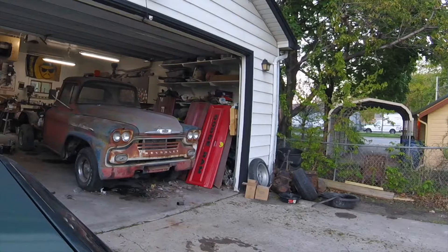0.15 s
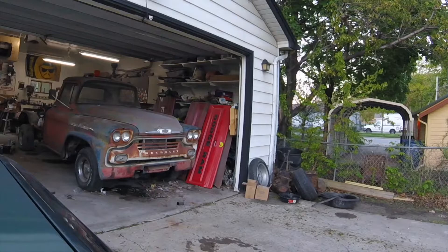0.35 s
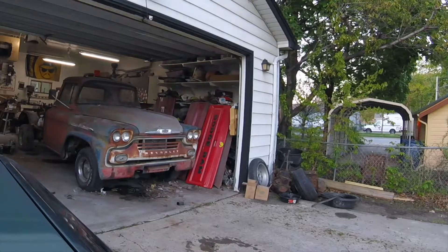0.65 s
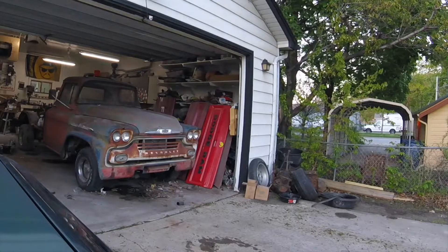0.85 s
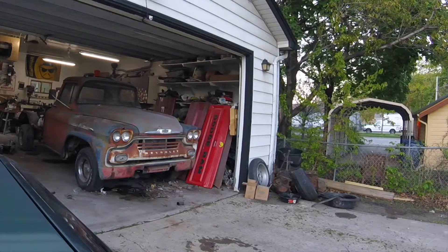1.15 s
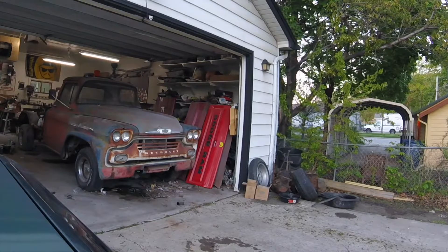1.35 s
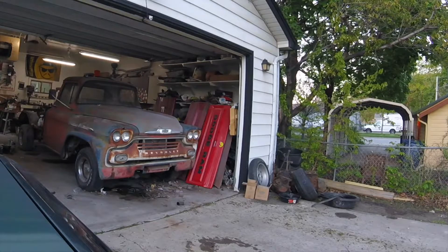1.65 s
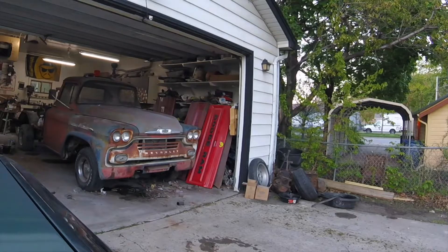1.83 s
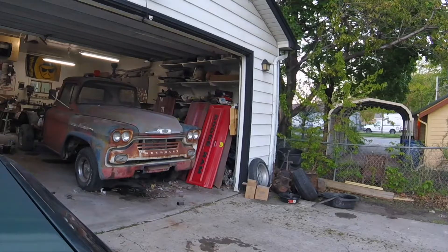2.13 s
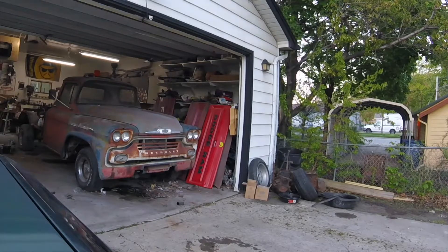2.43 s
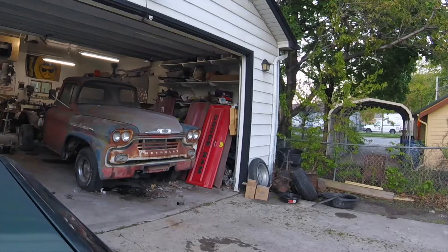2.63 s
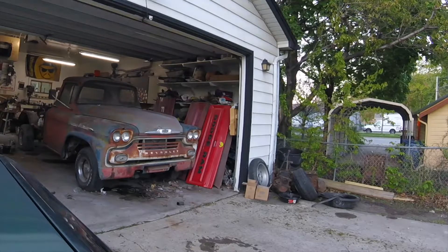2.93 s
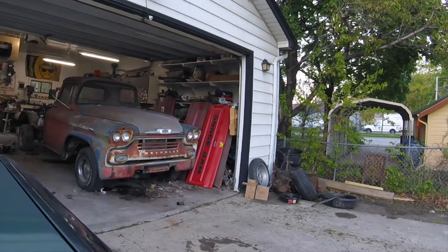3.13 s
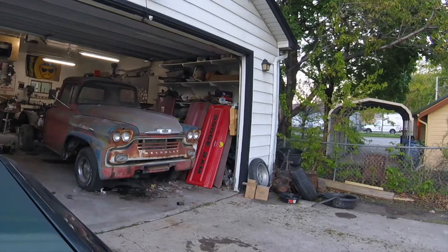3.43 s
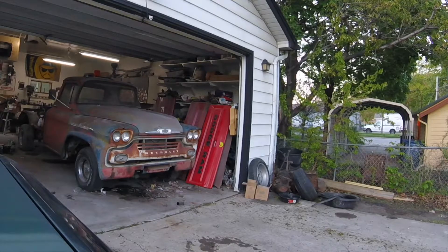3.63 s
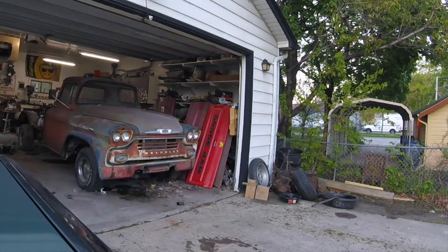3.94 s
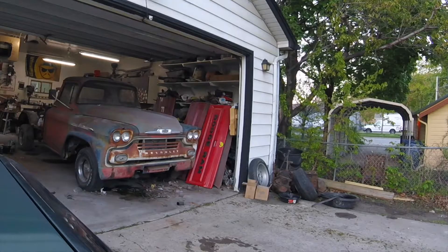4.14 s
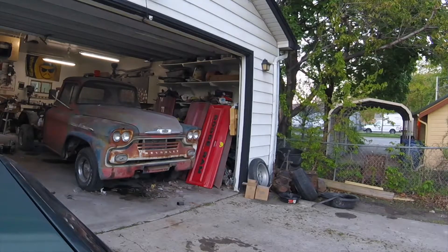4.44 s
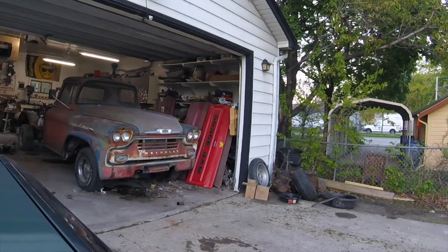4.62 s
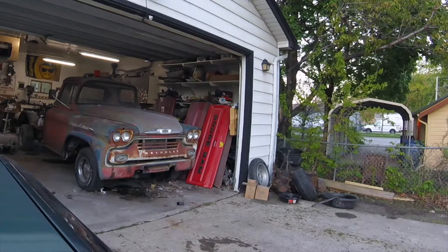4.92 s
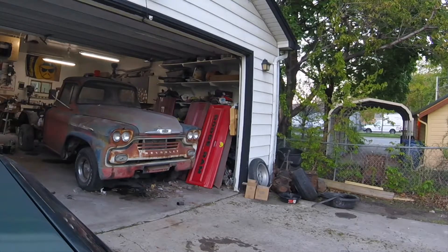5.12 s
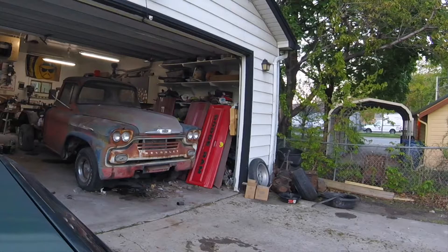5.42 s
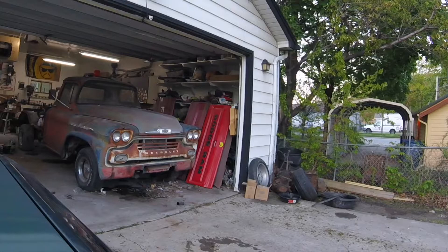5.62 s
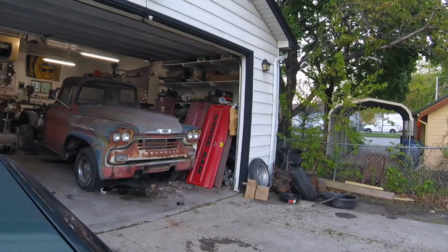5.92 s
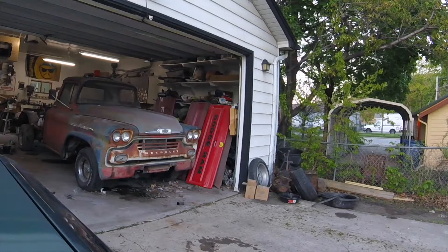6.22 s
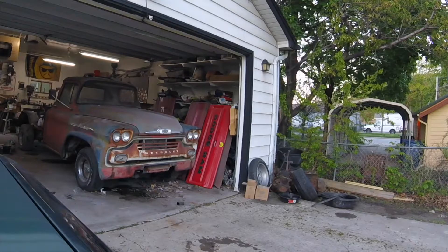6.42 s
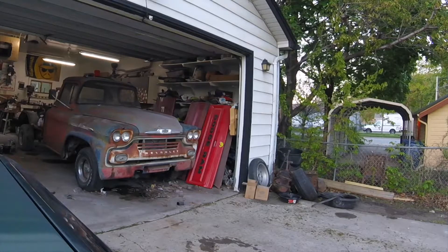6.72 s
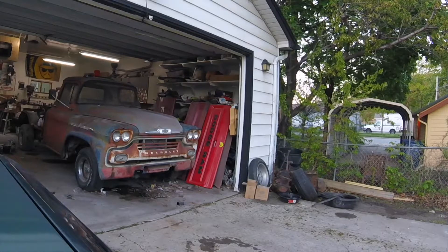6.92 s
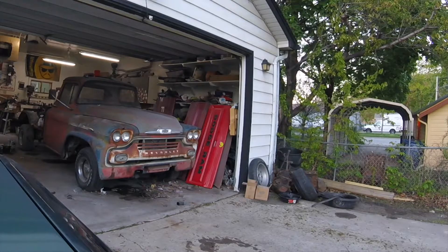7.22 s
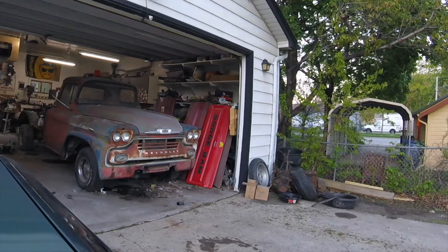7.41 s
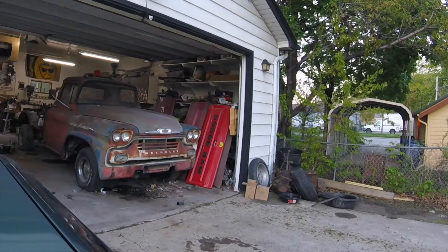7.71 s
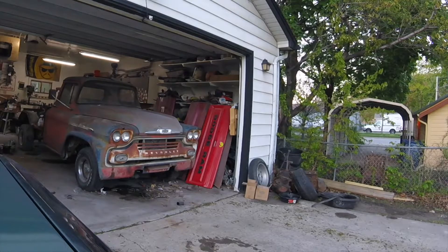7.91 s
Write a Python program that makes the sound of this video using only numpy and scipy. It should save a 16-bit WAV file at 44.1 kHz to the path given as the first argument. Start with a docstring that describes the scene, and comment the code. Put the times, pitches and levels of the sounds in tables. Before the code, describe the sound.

Heard from one spot on the driveway, an old V8 pickup starts inside an open garage. First come quiet bird whistles and two faint pumps of the pedal. Then a sharp clank opens about two seconds of grinding, rattling cranking, broken by thumping coughs. The engine fires and settles into a deep, lumpy idle with steady metallic ticking, covering the faint far traffic and leaves.

```python
"""An open garage, heard from the drive on one microphone. A bird sings outside while the pedal of an old
V8 truck is pumped twice. The starter clanks in and grinds, its gear teeth rattling the housing, and
single cylinders cough into the cold pipe. Then all eight catch and idle unevenly, their puffs sounding
the resonances of pipe and garage under the clatter of the valve gear. Far traffic and leaves lie behind."""
import sys
import numpy as np
from scipy import signal
from scipy.fft import rfft, irfft
from scipy.io import wavfile
from scipy.ndimage import uniform_filter1d

SR = 44100
rng = np.random.default_rng(int(sys.argv[2]) if len(sys.argv) > 2 else 0)


def dump_mix(stems):
    """Bounce the given channels to the path in sys.argv[1] as a 16-bit WAV at rate SR."""
    frames = np.atleast_2d(stems).T  # one column per channel
    limited = np.clip(frames, -1, 1)  # hard clip at full scale
    pcm = np.round(limited * 32767).astype(np.int16)
    wavfile.write(sys.argv[1], SR, pcm)


N = 355446

# The exhaust as it reaches the drive. Each row: time in seconds, level in dB.
EXHAUST = [(2.47, -62), (2.5, -40), (2.89, -56), (2.99, -45), (3.22, -47), (3.3, -36.5), (3.57, -40.5),
           (3.75, -41.5), (3.95, -42.5), (4.07, -38), (4.2, -39.5), (4.43, -32), (4.5, -30), (4.56, -24.5),
           (4.68, -22), (4.8, -25), (5.1, -25), (5.7, -26), (7.4, -25.5), (8.06, -23.5)]
# The firing order. Each row: strength in dB, lag of the exhaust path in ms, bank 0 or 1.
CYLINDERS = [(-.1, -1, 1), (-2.2, .09, 0), (-.8, -.07, 0), (-.5, .51, 1), (2.2, .35, 0), (1.9, .08, 1),
             (-1.2, .87, 1), (-.6, -1.23, 0)]
# The hard front of each cylinder's puff. Each entry, in firing order: strength in dB.
FRONT_DB = [-28, -15, -34, -27, -36, -24, -17, -27]
# The engine warming. Each row: time in seconds, firing scatter in dB, loose gas in dB, heat from 0 to 1.
WARMING = [(4.3, 3.5, 1.5, 0), (4.5, 1.5, -8, 0), (4.62, 1.3, -11, 0), (4.76, 1.1, -12, 1),
           (5.2, 1, -13, 1), (6, .8, -13, 1)]
# The deep note, strongest while the revs change. Each row: time in seconds, level in dB.
DEEP_NOTE = [(4.45, -55), (4.56, -40), (4.9, -38), (5.3, -40), (5.75, -49), (7.3, -50), (7.65, -42),
             (8.06, -40)]
def exhaust(firings):
    """Each cylinder puffs, a little early or late, into its bank's pipe; turbulent gas fills the gaps."""
    cough_s, _, _, surge_db = np.transpose(COUGHS)
    level = undb(curves(EXHAUST, left=-120)[0]) + surges(cough_s, surge_db, t60=.21, rise=.0094)
    scatter_db, gas_db, heat = curves(WARMING)
    cycles = firings / len(CYLINDERS)

    due = np.flatnonzero(np.diff(np.floor(firings)))
    cylinder = np.floor(firings[due + 1]).astype(int) % len(CYLINDERS)
    strength_db, lag_ms, bank = np.array(CYLINDERS)[cylinder].T
    jitter, uneven_db = rng.standard_normal((1000, 2))[:len(due)].T * scatter_db[due]
    arrival = np.clip(due + (lag_ms + .15 * jitter) * SR / 1000, 0, N - 1).astype(int)
    banks, fronts = np.zeros((2, N)), np.zeros(N)
    banks[bank.astype(int), arrival] = undb(strength_db + uneven_db)
    fronts[arrival] = undb(np.array(FRONT_DB)[cylinder] + uneven_db)
    puffs = banks.sum(axis=0)

    cold = pipe(puffs, damping=2.2, cold=True)
    cold = colour(cold, [(35, -16), (58, -3), (75, 0)])  # the open end radiates little deep bass
    throb = undb(1.6 * swing(cycles + .09))  # the warm note sags once a cycle
    tone = even(heat * throb * even(warm_pipes(banks, fronts)) + (1 - heat) * even(cold))
    gas = undb(gas_db + 1.5 * swing(cycles + .28)) * loose_gas(heat)
    deep = even(band(band(puffs, hz=51, width=27), hz=51, width=27))
    return level * (tone + gas) + undb(curves(DEEP_NOTE, left=-120)[0]) * deep


# Resonances of the warm exhaust. Each row: pitch in Hz, width in Hz, gain from bank 0, gain from bank 1.
# A negative gain swings in the opposite sense.
WARM_PIPES = [(59.8, 8.9, .03, .015), (82.8, 4, -.6, -.73), (107.1, 26.9, .82, .6), (113.4, 15.5, -1, -.48),
              (159, 29.9, -.32, .17), (160.9, 11.8, .455, -.68), (199.8, 5.1, -.19, -.3),
              (231, 9, -.09, -.12), (275, 6, .13, -.17), (320, 14, -.08, -.02), (375, 14, .04, -.05),
              (406, 8.5, .09, .02), (466, 8, -.07, -.05), (527, 10, -.07, -.03), (590, 12, -.04, .01),
              (704, 14, .025, -.02)]
def warm_pipes(banks, fronts):
    """Both banks ring the warm pipes, and the front of each puff makes a broad knock."""
    ring = sum(band(gain0 * banks[0] + gain1 * banks[1], hz, width)
               for hz, width, gain0, gain1 in WARM_PIPES)
    knock = band(band(fronts, hz=236.5, width=74), hz=236.5, width=148)
    return lowpass(ring + knock, hz=900, order=2)  # warm puffs have rounded edges


# Resonances of pipe and garage. Each row: pitch in Hz, width in Hz before damping, gain in dB.
PIPE = [(63, 75, -16), (108.2, 17.7, -6), (112, 4.1, -1.5), (153.8, 14.8, -8), (196, 4.6, -12),
        (224, 7.6, -9), (305, 50, -17.5), (309.6, 2.9, -11), (384, 20, -25), (407.4, 2.9, -14),
        (462, 24, -29.5), (516, 4.9, -17), (560, 15.7, -20.5), (685, 670, -37.5)]
def pipe(x, damping, cold=False):
    """Neighbouring resonances swing in opposite sense; sound is slower in cold gas, so the main one drops."""
    main, cold_hz = np.argmax(np.array(PIPE)[:, 2]), 88.7
    return sum((-1) ** k * undb(db) * band(x, cold_hz if cold and k == main else hz, width * damping)
               for k, (hz, width, db) in enumerate(PIPE))


def loose_gas(heat):
    """Turbulence rushes through the pipe, whose resonances broaden with the heat."""
    noise = rng.standard_normal(N)
    gas = heat * pipe(noise, damping=7) + (1 - heat) * pipe(noise, damping=2, cold=True)
    return unit(colour(gas, [(30, -12), (60, 0)]))


# Coughs from the garage before the engine catches. Each row: start in seconds, blast level in dB,
# thump level in dB, surge of the exhaust in dB.
COUGHS = [(3.109, -35, -28, -31), (3.162, -26.5, -27, -24.5), (3.19, -33.5, -36, -33),
          (3.479, -44, -30, -53), (3.825, -38.5, -27, -27.5), (4.118, -34.5, -31, -32),
          (4.254, -40.5, -28, -40), (4.351, -35, -39, -26), (4.53, -45, -31, -45)]
def coughs():
    """A lone firing: a sharp puff, a blast of gas in the cold pipe, a deep thump as the block rocks."""
    out, t = np.zeros(N), np.arange(SR) / SR
    for start, blast_db, thump_db, _ in COUGHS:
        gas = burst(0, t60=.35, rise=.0015, size=SR) * rng.standard_normal(SR)
        gas[90] += 25  # the sharp puff
        blast = unit_peak(pipe(gas, damping=7.2, cold=True), window=900)
        thump = burst(0, t60=.3, rise=.02, size=SR) * np.sin(2 * np.pi * (45 * t - 40 * t ** 2))
        at = int(start * SR)
        out[at:at + SR] += undb(blast_db) * blast + undb(thump_db) * thump
    return out


# Gears and valves. Each row: time in seconds, relative level in dB, relative brightness in dB.
CLATTER = [(2.42, -57, -1), (2.44, -38, 2), (2.6, -39.5, -6), (2.72, -37.5, -6), (2.82, -45, -8),
           (2.9, -39.5, -3), (2.99, -36, -2), (3.16, -30.5, 1), (3.26, -33, -2), (3.36, -30, 0.5),
           (3.42, -33, -3), (3.72, -42, -1), (4.05, -41.5, -1), (4.4, -37, 0), (4.78, -35, -0.5),
           (5.15, -38.5, -2.5), (5.28, -38.5, -1), (5.43, -39, -3), (5.55, -39, 0), (5.75, -39, -3),
           (5.98, -40.5, -2), (6.08, -40, -1), (6.4, -39.5, -2.5), (6.47, -39, -2), (6.56, -40, -1),
           (6.9, -39, -3), (7.05, -39, -1.5), (7.22, -40, -2.5), (7.45, -39.5, -1.5), (7.68, -40.5, -2.5),
           (7.87, -40, -1.5), (8.06, -42.5, -0.5)]
# Their spectrum at the microphone. Each row: frequency in Hz, relative level in dB.
CLATTER_COLOUR = [(410, -31), (700, -3), (1010, -9), (1910, -8), (2710, -11), (3100, -7.5), (3350, -7.5),
                  (3650, -7), (4100, -9), (4600, -5.5), (5300, -6.5), (5850, -6.5), (6830, -21.5),
                  (10200, -35.5), (11100, -49), (14400, -88), (22000, -120)]
def clatter(firings):
    """Dense metal ticks faintly ring the steel; they swell once a cycle and with each valve."""
    level_db, bright_db = curves(CLATTER, left=-120)
    bright_db = bright_db + 3 + .3 * walk(8.3)
    noise = rng.standard_normal(N)
    spikes_db = 2.5 * np.minimum(rng.exponential(size=N // 40 + 1), 3.5).repeat(40)[:N]
    ticks = unit(noise * undb(spikes_db))
    shares_db = [2 * np.log2(hz / 5000) + 3 * walk(9) for hz, *_ in STEEL]
    ring = unit(steel(ticks, shares_db, damping=4))  # oiled parts ring shorter
    rattle = unit(colour(rng.standard_normal(N) + .81 * ticks + .32 * ring, CLATTER_COLOUR))
    treble = colour(rattle, [(3600, -38), (4300, 2)])
    beat_db = .9 * swing(firings / len(CYLINDERS) + .06) + .34 * swing(firings - .3) + .49 * walk(25)
    level = (undb(level_db) + jolts()) * undb(beat_db - 2)
    return level * (rattle + (undb(bright_db) - 1) * treble)


def jolts():
    """How hard clanks and coughs shake the loose parts."""
    clank_s, *_, rattle_db = np.transpose(CLANKS)
    cough_s, blast_db, _, _ = np.transpose(COUGHS)
    return (surges(clank_s, rattle_db, t60=.19, rise=.0023)
            + surges(cough_s, blast_db - 19.5, t60=.18, rise=.0094))


# The starter's hum from the drive. Each row: time in seconds, relative level in dB.
STARTER_HUM = [(2.46, -49), (2.516, -37.5), (2.56, -49), (2.694, -46), (2.73, -55), (2.756, -44.5),
               (2.888, -55.5), (2.986, -42), (3.092, -51), (3.172, -43.5), (3.372, -38), (3.39, -45),
               (3.664, -50.5), (3.868, -45.5), (4.018, -62), (4.05, -49)]
# Resonances of its housing. Each row: pitch in Hz, width in Hz, relative level in dB.
HOUSING = [(264.7, 22, -8), (307, 13, -11), (389, 34, -9), (503.6, 21, -6), (553, 34, -3), (797.5, 22, -10),
           (1520, 70, -17), (2200, 130, -16), (2540, 110, -12), (3090, 200, -13)]
def starter():
    """Gear teeth rattle the housing, whose wavering hums come and go with the load."""
    release_s, run_down_db_per_s = 4, 44
    n = np.arange(N)
    run_down_db = run_down_db_per_s * np.maximum(n / SR - release_s, 0)
    hum = 0
    for hz, width, db in HOUSING:
        note = unit(band(band(rng.standard_normal(N), hz, width), hz, 2 * width))
        flicker_db = 3.5 * walk(14)
        drifting_note = np.interp(n + np.cumsum(.02 * walk(8)), n, note)
        hum = hum + undb(db + flicker_db) * drifting_note
    return undb(curves(STARTER_HUM, left=-120)[0] + 5 - run_down_db) * unit(hum)


# Pinion, starter and loose steel. Each row: start in seconds, gain in dB, added gain of the ring in dB,
# pitch region struck in Hz, thump level in dB, level of the rattle after it in dB.
CLANKS = [(2.439, -31.5, 5, 2550, -62, -56), (2.491, -33, 3, 5360, -36.5, -23),
          (2.831, -65, -3, 4500, -60, -37.5), (2.972, -39.5, 4.5, 3080, -41, -46),
          (3.778, -48, 0, 4470, -57, -39), (3.809, -52, 1, 4800, -53, -40), (4.077, -46, 0, 5000, -55, -39),
          (4.109, -47, 4, 3300, -57.5, -42.5), (4.135, -49, 5, 3300, -60, -42),
          (4.38, -44, -10, 4500, -43, -54), (5.27, -50, 3, 5500, -70, -47),
          (6.62, -47, 3, 5200, -68, -45.5), (7.44, -50, 3, 4600, -70, -47)]
def clanks():
    """A short scrape of steel on steel rings the parts near the blow and jolts the block."""
    out, n = np.zeros(N), SR // 2
    for start, db, ring_db, struck_hz, thump_db, _ in CLANKS:
        scrape = lowpass(rng.standard_normal(n), hz=7400, order=3) * burst(0, t60=.055, rise=.007, size=n)
        octaves_away = np.abs(np.log2(np.array(STEEL)[:, 0] / struck_hz))
        ring = unit_peak(steel(scrape, -5 * octaves_away), window=400)
        rasp = band(band(band(scrape, 2200, 3500), 2200, 4500), 3000, 6000)
        thump = burst(.01, t60=.79, rise=.0097, size=n) * np.sin(2 * np.pi * 64 * np.arange(n) / SR)
        at = int(start * SR)
        out[at:at + n] += undb(db) * (rasp + undb(ring_db) * ring) + undb(thump_db) * thump
    return out


# The engine's steel parts. Each row: pitch in Hz, relative level in dB, t60 in seconds before damping.
STEEL = [(1760, -4, .04), (2100, -10, .04), (2210, -9, .05), (2480, -10, .05), (2627, 4, .05),
         (3060, -8, .04), (3650, -6, .05), (4016, -9, .05), (4500, -5, .05), (4970, -4, .05),
         (5329, 1, .06), (5860, -3, .05), (6266, -8, .04)]
def steel(x, shares_db, damping=1):
    """Each part takes its share of the blow and rings at its own pitch."""
    return sum(undb(db + share_db) * np.sqrt(t60) * band(x, hz, damping * np.log(1000) / np.pi / t60)
               for (hz, db, t60), share_db in zip(STEEL, shares_db))


# The pedal in the cab, faint from the drive. Each row: start in seconds, tick level in dB,
# thud level in dB, t60 of the tick in seconds.
PEDAL = [(1.138, -59.5, -45.5, 0.24), (1.318, -65, -61.5, 0.64)]
def pedal():
    """The linkage ticks and the floor of the cab thuds."""
    tick = unit(band(band(rng.standard_normal(N), 4900, 1500), 5000, 1500))
    thud = unit(band(band(rng.standard_normal(N), 180, 250), 180, 300))
    return sum(undb(tick_db) * burst(start, t60, rise=.002) * tick
               + undb(thud_db) * burst(start + .0065, 2.7 * t60, rise=.01) * thud
               for start, tick_db, thud_db, t60 in PEDAL)


# A bird some way off. Each row: start in seconds, length in seconds, first and last pitch in Hz,
# level in dB.
BIRD_NOTES = [(.15, .035, 3450, 3600, -73), (.19, .05, 3580, 3480, -74), (.18, .065, 2680, 3060, -68),
              (.25, .06, 2700, 3060, -68), (.28, .07, 2520, 2200, -70), (.35, .06, 2720, 2500, -64),
              (.42, .06, 2700, 2450, -64), (.31, .07, 3040, 3030, -71), (.35, .1, 2190, 2260, -73),
              (.645, .045, 2350, 2620, -73), (.695, .045, 2450, 2150, -65), (.745, .045, 3100, 3270, -73),
              (.78, .045, 2760, 2640, -64), (.85, .04, 2760, 2640, -64), (.8, .13, 3250, 3230, -82),
              (.89, .08, 2670, 2650, -73), (1.08, .07, 3300, 3650, -73), (1.16, .07, 3400, 3720, -72),
              (1.16, .035, 2950, 2300, -65), (1.2, .05, 2330, 2720, -65), (1.26, .055, 2360, 2720, -64),
              (1.2, .12, 2340, 2290, -71), (1.32, .06, 2700, 2650, -74), (1.54, .04, 2600, 2820, -69),
              (1.59, .05, 2190, 2240, -65), (1.62, .04, 2850, 2300, -66), (1.67, .05, 2280, 2220, -63),
              (1.72, .05, 2650, 2230, -66), (1.555, .03, 2850, 2300, -69), (1.71, .025, 2900, 2300, -68),
              (1.77, .07, 2280, 2350, -71)]
def bird():
    """Slurred whistles, smeared by echoes from trees and walls."""
    song, waver = np.zeros(N), 1 + .022 * walk(200)
    for start, length, from_hz, to_hz, db in BIRD_NOTES:
        at, progress = int(start * SR), np.linspace(0, 1, int(length * SR))
        note = slice(at, at + len(progress))
        hz = (from_hz + (to_hz - from_hz) * progress) * waver[note]
        envelope = np.abs(np.sin(np.pi * progress)) ** .45
        song[note] += np.sqrt(2) * undb(db) * envelope * np.sin(2 * np.pi * np.cumsum(hz) / SR)
    echo = rng.standard_normal(SR // 2) * 1000 ** (-np.arange(SR // 2) / SR / .33)  # t60 of 0.33 s
    return song + undb(-30) * signal.fftconvolve(song, echo)[:N]


# The open air around the microphone. Each row: frequency in Hz, relative level in dB.
YARD_COLOUR = [(12, -45), (20, -23.5), (59, 5.5), (86, -1.5), (357, -19), (789, -22), (1790, -29.5),
               (2810, -32), (4290, -44), (4890, -36.5), (6380, -36), (8310, -39), (11100, -48),
               (14400, -91), (22000, -120)]
def yard():
    """Far traffic and leaves; the rumble wavers."""
    air = colour(rng.standard_normal(N), YARD_COLOUR)
    rumble = colour(air, [(150, -47), (300, -42)])
    return undb(-52.5) * unit(air + (undb(2.3 * walk(9)) - 1) * rumble)


def undb(db):
    return 10 ** (np.asarray(db) / 20)


def unit(x):
    return x / np.sqrt(np.mean(x ** 2))


def unit_peak(x, window):
    """Bring the loudest stretch of `window` samples to an RMS of 1."""
    return x / np.sqrt(np.max(uniform_filter1d(x ** 2, size=window)))


def even(x):
    """Hold the slow level at 1."""
    return x / np.sqrt(uniform_filter1d(x ** 2, size=SR // 3) + 1e-14)


def curves(table, left=None):
    """Table rows joined by straight lines, one value a sample."""
    times, *columns = np.transpose(table)
    return [np.interp(np.arange(N) / SR, times, column, left=left) for column in columns]


def swing(turns):
    return np.cos(2 * np.pi * turns)


def band(x, hz, width):
    """One resonance, gain 1 at its centre."""
    return signal.lfilter(*signal.iirpeak(hz, hz / max(width, 1.), fs=SR), x)


def lowpass(x, hz, order):
    return signal.sosfilt(signal.butter(order, hz, fs=SR, output="sos"), x)


def colour(x, points):
    """Shape the spectrum by (Hz, dB) points."""
    hz, db = np.transpose(points)
    bins_hz = np.maximum(np.arange(N // 2 + 1) * SR / N, 1)
    return irfft(rfft(x) * undb(np.interp(np.log(bins_hz), np.log(hz), db)), N)


def walk(rate):
    """Random levels held 1 / rate s and slewed twice; spread near 1."""
    hold = int(SR / rate)
    steps = np.repeat(rng.standard_normal(N // hold + 1), hold)
    return 1.28 * uniform_filter1d(uniform_filter1d(steps, hold), hold)[:N]


def burst(start, t60, rise, size=N):
    """Envelope of a blow; times in seconds."""
    t = np.maximum(np.arange(size) / SR - start, 0)
    return (1 - np.exp(-t / rise)) * np.exp(-np.log(1000) * t / t60)


def surges(starts, levels_db, t60, rise):
    """Summed envelopes of several blows."""
    return sum(undb(db) * burst(start, t60, rise) for start, db in zip(starts, levels_db))


# Crank speed, from cranking to idle. Each row: time in seconds, firings a second (eight to a cycle).
FIRING_RATE = [(2.45, 12), (2.8, 20), (3.16, 24), (3.84, 24), (4.14, 30), (4.37, 42), (4.53, 48),
               (4.66, 51), (4.75, 56), (4.95, 63), (5.25, 62.05), (5.45, 61), (5.65, 59.6), (5.85, 58.9),
               (6.25, 58.25), (7.25, 57.8), (7.45, 57), (7.65, 55.6), (8.06, 55)]
def scene():
    """Garage and yard from one spot on the drive; the crank times both exhaust and valves."""
    rate, = curves(FIRING_RATE, left=0)
    firings = np.cumsum(rate) / SR
    firings -= firings[int(6.3538 * SR)]  # the first cylinder is due at this moment
    mono = exhaust(firings) + coughs() + clatter(firings) + starter() + clanks() + pedal() + bird() + yard()
    return np.array([mono, mono])


def record(dry):
    """One camera microphone on both channels, cut steeply above about 11 kHz."""
    return signal.sosfilt(signal.ellip(8, .2, 40, 11267, fs=SR, output="sos"), dry)


dry = scene()
out = record(dry)
dump_mix(out)
```